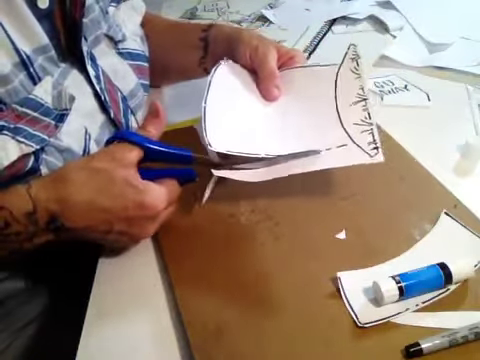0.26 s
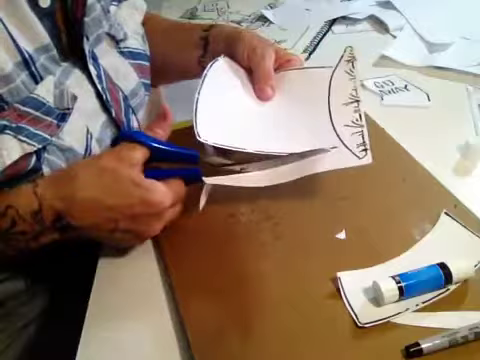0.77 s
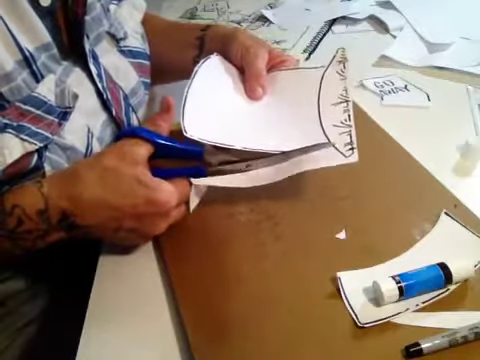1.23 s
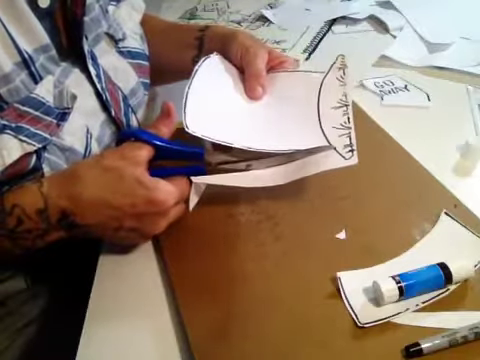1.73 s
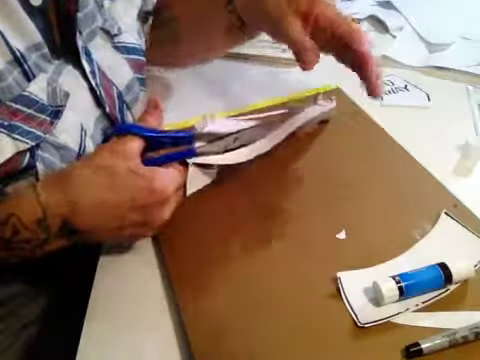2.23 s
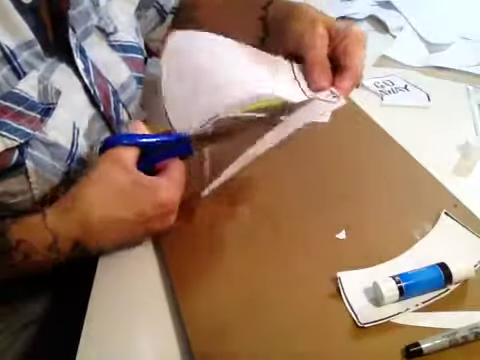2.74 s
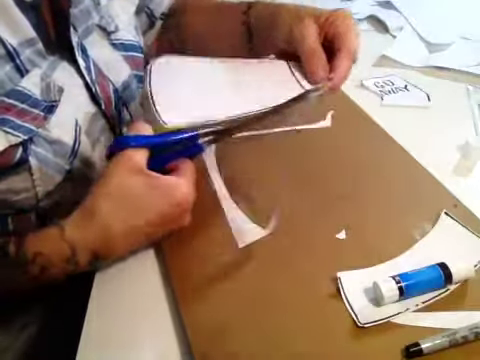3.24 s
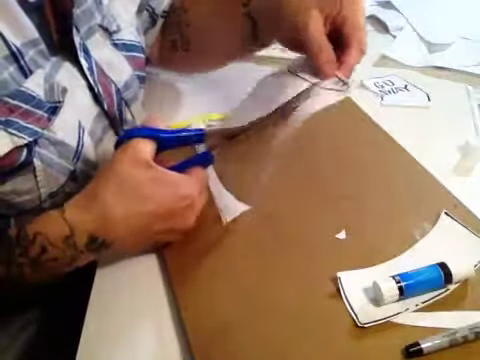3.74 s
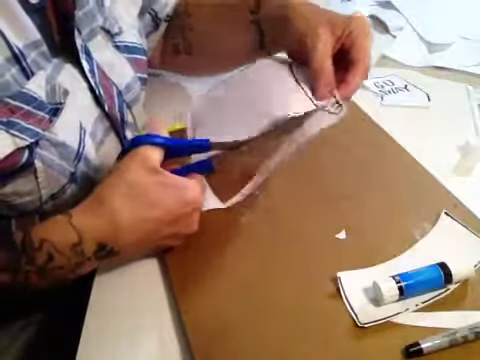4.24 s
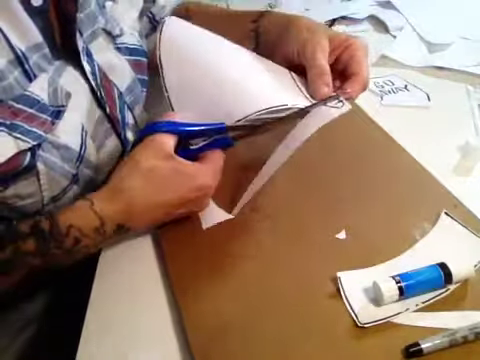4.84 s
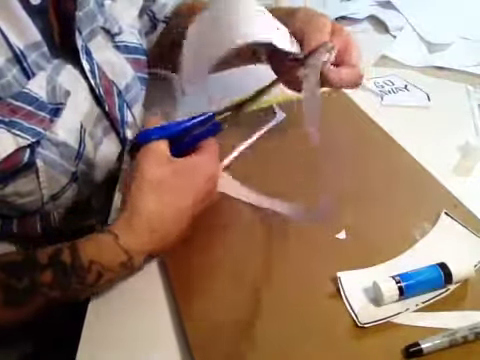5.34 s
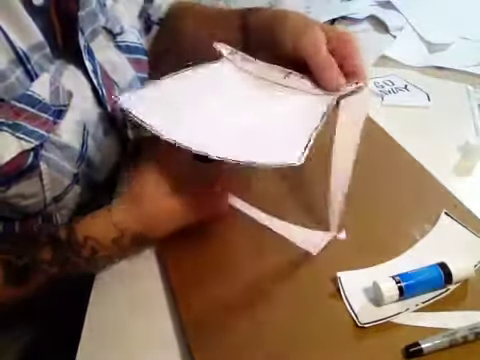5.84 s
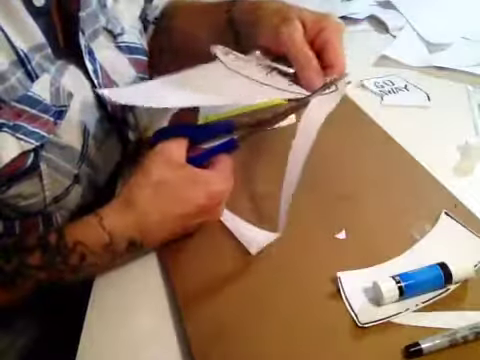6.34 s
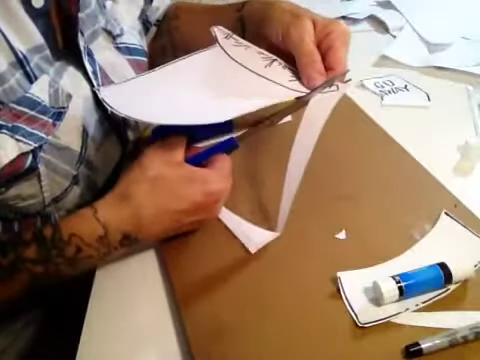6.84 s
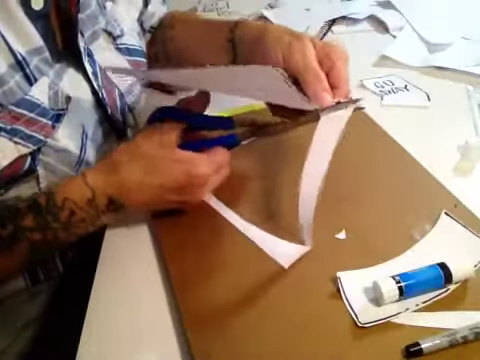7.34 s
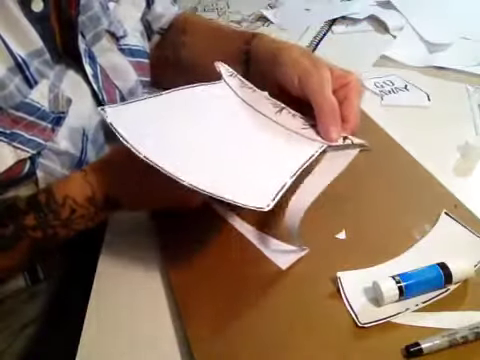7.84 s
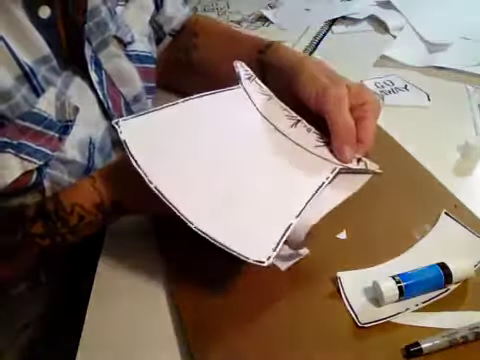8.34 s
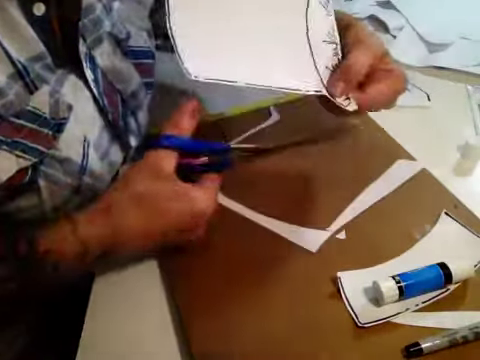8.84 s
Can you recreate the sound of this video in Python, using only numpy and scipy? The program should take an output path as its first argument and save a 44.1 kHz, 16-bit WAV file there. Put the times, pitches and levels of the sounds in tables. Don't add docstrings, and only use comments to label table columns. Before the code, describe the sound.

Close, bright recording in a small room with short echoes, a faint low fan hum and soft steady hiss throughout. From 0 to 1.8 seconds scissors bite through paper in rapid uneven strokes, a gritty stream of tiny fibre clicks with metallic grinding and blade chatter. After a brief lull the sheet knocks the desk dully at about 2.0, then crumples loudly around 2.4 to 2.5. From 2.7 to 5 it rustles, rubs and flaps softly, with small folds and pops near 3.5 and 3.75. Crackling strengthens from 5.2, reaching a deep, heavy crumple at 5.7 to 5.9. From 6.2 short trims come with quiet gaps; crisp bright snips cluster around 7.4 to 7.6, thin out near 8, then build to a sharp, strong snip at 8.55. A last rustle and lighter click fall at about 9.05.

```python
import sys
import numpy as np
from scipy import signal
from scipy.io import wavfile
from scipy.ndimage import uniform_filter1d

SR = 44100
rng = np.random.default_rng(int(sys.argv[2]) if len(sys.argv) > 2 else 0)


def attenuation_scalar(level_db):
    decades = np.asarray(level_db, float) / 20
    return 10 ** decades


def transcribe(u):
    v = np.clip(np.atleast_2d(u).T, -1, 1)
    q = np.round(v * 32767).astype(np.int16)
    wavfile.write(sys.argv[1], SR, q)


N = 401310

# pitch_hz, level_db
TEAR_SPECTRUM = [(900, -39), (1800, -9.5), (3000, 0), (5000, 1), (8000, 2.5), (11000, 3), (14000, 5.5),
                 (16500, -2)]
# pitch_hz, level_db
SHEET_SPECTRUM = [(300, -28), (1000, -7.5), (1200, 2.5), (1600, 0), (2200, 0.5), (3200, -2), (5000, -6.5),
                  (9000, -24)]
# pitch_hz, level_db
KNOCK_SPECTRUM = [(120, -20.5), (260, -14.5), (380, -4), (480, -6.5), (600, -4), (820, -6.5), (1100, -13.5),
                  (2500, -43.5)]
# start_s, flap_looseness_db, edge_tautness_db
GRIP_CURVE = [(0, -18, -2), (.47, -14.5, -4), (.7, -14, -3), (1.4, -9.5, -4), (1.75, -52, -3.5),
              (2.05, 2.5, -5), (2.3, -20, -2.5), (2.65, -3.5, -5), (3.3, -9.5, -3.5), (4.1, -18.5, -2.5),
              (5.2, -6, -4.5), (5.75, -16.5, -3.5), (5.9, -7, -4), (6.4, -7, -4), (7.05, -4, -2.5),
              (7.4, -14, -2), (8.4, -28, -3), (9.1, 4.5, -2.5)]


def evened(x):
    return x / np.sqrt(np.mean(x ** 2) + 1e-20)


def colour(x, points):
    hz, db = np.transpose(points)
    bins_hz = np.fft.rfftfreq(4096, 1 / SR)
    log_gain = np.log(attenuation_scalar(np.interp(np.log(bins_hz + 1), np.log(hz), db)))
    circle = np.concatenate([log_gain, log_gain[-2:0:-1]])
    taps = np.fft.ifft(np.exp(np.conj(signal.hilbert(circle)))).real[:2048]
    return signal.oaconvolve(x, taps / np.linalg.norm(taps))[:N]


def ring(x, modes):
    t = np.arange(4096) / SR
    taps = np.zeros(len(t))
    for hz, width_hz, db in modes:
        decay = np.sqrt(4 * np.pi * width_hz / SR) * np.exp(-np.pi * width_hz * t)
        taps += attenuation_scalar(db) * decay * np.sin(2 * np.pi * hz * t)
    return signal.oaconvolve(x, taps)[:N]


def fibres(per_s, spread_db, clump_db, clump_s):
    window = int(clump_s * SR) + 1
    clumps = evened(uniform_filter1d(uniform_filter1d(rng.standard_normal(N), window), window))
    size = attenuation_scalar(spread_db * np.minimum(rng.exponential(1, (4, N)), 4) + clump_db * clumps)
    sign = rng.choice([-1., 1.], (4, N))
    return evened(size * sign * (rng.random((4, N)) < per_s / SR))


def stroke_power():
    # peak_s, rise_s, fall_s, tearing_db, blades_over_tearing_db
    long_cuts = [(.02, 0.022, 0.3, -51, -7), (.19, 0.19, 0.096, -52, -8), (0.381, 0.066, 0.17, -48, -22),
                 (.47, 0.16, 0.13, -50.5, -7.5), (.692, 0.023, 0.13, -47.5, -5.5),
                 (.776, 0.075, 0.13, -53, -4), (.882, 0.014, 0.12, -57.5, -12),
                 (1.042, 0.035, 0.34, -52.5, -18), (1.338, .015, 0.22, -54.5, -19.5),
                 (1.39, 0.095, 0.27, -55, -7), (1.576, 0.065, 0.056, -56, -11),
                 (1.666, 0.028, 0.04, -51.5, -12), (1.766, 0.16, 0.027, -54, -15)]
    # peak_s, rise_s, fall_s, rubbing_db, sheet_over_rubbing_db
    turns = [(1.97, 0.11, 0.029, -51.5, -4), (2.08, 0.11, 0.16, -45, -8), (2.298, 0.25, 0.18, -45, -4),
             (2.446, 0.011, 0.16, -39, -9.5), (2.47, 0.027, 0.31, -45, 2), (2.704, 0.17, 0.076, -51.5, -9),
             (3.26, 0.88, 0.21, -53.5, -2), (3.36, 0.1, 0.29, -51, -2), (3.54, 0.32, 0.26, -51, 2.5),
             (3.66, 0.032, 0.14, -47.5, -15), (3.78, 0.13, 0.76, -51, 1), (4.071, 0.041, 0.3, -46, -1.5),
             (4.34, 0.068, 0.27, -50, -2), (4.51, 0.2, 0.088, -46, -5.5), (4.58, 0.075, 0.13, -46.5, -6),
             (4.769, 0.19, 0.26, -43.5, -3.5), (4.87, 0.26, 0.052, -48, -5), (3.0, 0.5, 0.15, -59, -9),
             (5.124, 0.14, 0.43, -43, -9), (5.302, 0.017, 0.45, -45, -6), (5.47, 0.5, 0.025, -48, -25),
             (5.558, 0.07, 0.32, -44, -14), (5.724, 0.14, 0.1, -36, -7), (5.822, 0.092, 0.37, -40, -7)]
    # peak_s, rise_s, fall_s, tearing_db,
    # sheet_over_tearing_db
    trims = [(6.168, 0.059, 0.76, -53, -9), (6.446, 0.17, 0.031, -52, -5), (6.754, 0.029, 0.16, -55.5, -2),
             (7.044, 0.05, 0.068, -46.5, -3.5), (7.214, 0.34, 0.11, -51.5, -7.5),
             (7.43, 0.22, 0.18, -48, -4.5), (7.594, 0.057, 0.17, -46.5, -8.5),
             (7.696, .1, 0.39, -59.5, -14), (7.938, .02, .6, -63.5, -19), (8.134, 0.025, 0.089, -54.5, -11),
             (8.256, 0.35, .3, -58, -17), (8.4, 0.032, 0.054, -48.5, -10), (8.54, 0.12, 0.35, -45, -8),
             (8.68, .12, 0.16, -47, -11), (8.75, 0.35, 0.067, -44.5, -4.5), (9.042, .027, 0.62, -55, -15)]
    # start_s (centre), half_width_s, depth_db
    pauses = [(1.25, .03, -4), (2.19, .03, -4), (2.58, .02, -5), (2.78, .03, -4), (2.92, .02, -4),
              (3.145, .025, -4), (3.62, .02, -4), (3.955, .03, -4), (4.18, .05, -4), (4.62, .03, -4),
              (5.5, .015, -4), (6.04, .06, -6), (6.55, .08, -8), (7.34, .04, -6)]
    fade_db, fade_bend = 27, 1.225
    rows = [(*row, 2.5 + 0.15 * blades_db, blades_db) for *row, blades_db in long_cuts]
    rows += [(*row, -43) for row in [*turns, *trims]]
    clock = np.arange(0, N, 32) / SR
    power = np.zeros((4, len(clock)))
    for peak_s, rise_s, fall_s, db, sheet_db, blades_db in rows:
        away = np.where(clock < peak_s, (peak_s - clock) / rise_s, (clock - peak_s) / fall_s)
        shares = attenuation_scalar([-1.5, sheet_db - 5.5, sheet_db, blades_db])
        power += np.outer(shares, attenuation_scalar(db - fade_db * away ** fade_bend)) ** 2
    for s, half_s, depth_db in pauses:
        power *= attenuation_scalar(2 * depth_db * np.exp(-((clock - s) / half_s) ** 2))
    return np.array([np.interp(np.arange(N) / SR, clock, p) for p in power])


def efforts():
    # start_s, tearing_db, sheet_over_tearing_db
    cut_slips = [(0.013, -36, -10.5), (.085, -32.5, -13), (0.1425, -31, -12.5), (0.326, -52, 5.5),
                 (.3641, -45, -5), (.47, -43, -9), (.686, -38, -19), (0.716, -31.5, -10),
                 (.8816, -37, -10.5), (1.034, -31, -22), (1.074, -30, -25), (1.14, -38, -15),
                 (1.3334, -37, -16), (1.3718, -33, -10.5), (1.4046, -29, -13), (1.488, -32, -17),
                 (1.536, -34.5, -11.5), (1.5684, -33, -14.5), (1.6631, -48, -14), (1.7444, -47, -18),
                 (1.7629, -33, -25)]
    # start_s, tearing_db, sheet_over_tearing_db
    turn_slips = [(2.424, -27, -12), (2.4433, -35, -19), (2.4607, -19.5, -4), (2.5314, -28.5, -5),
                  (2.838, -45, -6.5), (3.051, -38, -12), (3.1757, -37, -4), (3.235, -35.5, -6),
                  (3.3484, -46, 4), (3.497, -46, 9), (3.7784, -42, 6), (3.902, -33.5, -5),
                  (4.004, -36, -15), (4.228, -38.5, -31), (4.283, -39, -12), (4.3794, -42, -2),
                  (4.568, -34, -20), (4.666, -31.5, -36), (5.178, -25.5, -13.5), (5.2963, -27.5, -22),
                  (5.5258, -41, -9), (5.734, -22, -30), (5.7882, -25, -32), (5.839, -23.5, 1),
                  (6.17, -51, -14), (6.243, -37, -14.5)]
    # start_s, tearing_db, sheet_over_tearing_db
    trim_slips = [(6.754, -29, -14), (6.81, -41, -12), (7.011, -36, -5), (7.0325, -26, -15),
                  (7.1365, -34.5, -9), (7.435, -27, -30), (7.5847, -25, -22), (8.012, -36, -21),
                  (8.1884, -37, -11), (8.231, -29, -16), (8.314, -33.5, -12), (8.3918, -73, -18),
                  (8.4597, -29, -19), (8.485, -34, -18), (9.0653, -38, -13)]
    power = stroke_power()
    grip_s, loose_db, _ = np.transpose(GRIP_CURVE)
    looseness = attenuation_scalar(np.interp(np.arange(N) / SR, grip_s, loose_db))
    power[2] = power[2] * looseness ** 2 + attenuation_scalar(-73) ** 2
    t = np.arange(8000) / SR
    # slips, t60 in s, blades over the sheet in dB
    for slips, t60, blades_db in [(cut_slips, 0.054, 9.5), (turn_slips, 0.09, -20.5), (trim_slips, 0.055, -20.5)]:
        for s, slip_db, sheet_db in slips:
            swell = (1 - np.exp(-t / 0.006)) * attenuation_scalar(slip_db - 8 - 60 * t / t60)
            shares = attenuation_scalar([0, sheet_db + 4.5, sheet_db - 5.0, sheet_db + blades_db])
            part = power[:, round(s * SR) - 40:][:, :len(t)]
            part += np.outer(shares, swell[:part.shape[1]]) ** 2
    return np.sqrt(power)


def bending(x, patchy_db, tilt):
    hz, t, z = signal.stft(x, SR, nperseg=256)
    patches = rng.standard_normal(z.shape[::-1]).T
    for _ in range(2):
        patches = uniform_filter1d(uniform_filter1d(patches, size=7, axis=0), size=14, axis=1)
    grip_s, _, taut_db = np.transpose(GRIP_CURVE)
    crisp_db = np.interp(t, grip_s, taut_db + 3.345)
    slope = tilt * np.log2(np.clip(hz, 3000, 15000) / 9500)[:, None]
    bent = z * attenuation_scalar(patchy_db * evened(patches) + slope * crisp_db)
    return signal.istft(bent, SR, nperseg=256)[1][:N]


def cutting():
    # pitch_hz, width_hz, level_db
    blade_modes = [(1150, 90, -7), (1900, 160, -6), (2200, 220, -2), (2780, 200, -6), (3650, 110, -11)]
    # pitch_hz, width_hz, level_db
    edge_modes = [(1195, 48, -31), (11500, 2400, -16), (14300, 2800, -3)]
    tear, sheet, flap, blades = efforts() * fibres(per_s=12000, spread_db=2.5, clump_db=1.1, clump_s=0.009)
    grinding = np.arange(N) / SR < 1.9
    edge = colour(tear, TEAR_SPECTRUM) + ring(grinding * tear, edge_modes)
    paper = bending(edge + colour(sheet, SHEET_SPECTRUM), patchy_db=2.0, tilt=1.98)
    return paper + colour(flap, KNOCK_SPECTRUM) + ring(blades, blade_modes)


def fan():
    # pitch_hz, width_hz, level_db
    fan_modes = [(176, 9, -61.5), (194, 8, -66), (297, 10, -70)]
    # pitch_hz, level_db (per Hz)
    air_spectrum = [(28, -9), (55, -20), (100, -7.5), (150, -11.5), (290, -0.5), (490, -13), (1000, -20),
                    (3650, -23.5), (16500, -26)]
    motor_hz, motor_db, air_db = 216.7, -64, -61.5
    tones = sum(ring(rng.standard_normal(N), [mode]) for mode in fan_modes)
    tones = signal.sosfilt(signal.butter(4, 150, "highpass", fs=SR, output="sos"), tones)
    tones += np.sqrt(2) * attenuation_scalar(motor_db) * np.sin(2 * np.pi * motor_hz * np.arange(N) / SR)
    return tones + attenuation_scalar(air_db) * colour(rng.standard_normal(N), air_spectrum)


def swells(rows, sharpness):
    t, out = np.arange(8000) / SR, np.zeros(N)
    for s, db, hz, t60 in rows:
        note = evened(signal.lfilter(*signal.iirpeak(hz, sharpness, SR), rng.standard_normal(len(t))))
        out[round(s * SR):][:len(t)] += note * (1 - np.exp(-t / 0.0071)) * attenuation_scalar(db - 60 * t / t60)
    return out


def chatters():
    # start_s, level_db, pitch_hz, t60_s
    chatter_events = [(.015, -41.5, 2000, 0.066), (.715, -44.5, 2170, 0.23), (.765, -44, 2220, 0.13),
                      (.77, -46, 7300, 0.067), (1.07, -48, 8200, .05), (1.16, -50, 7300, .04),
                      (1.39, -47, 2250, 0.19), (1.567, -45, 2230, 0.063), (1.67, -54, 2200, .08),
                      (1.752, -40, 2200, 0.086), (1.49, -45, 8300, 0.056), (1.54, -46, 8000, 0.054),
                      (1.57, -41, 8000, 0.059), (1.765, -44, 8100, .05), (.885, -43, 2350, 0.057),
                      (.72, -43, 1250, 0.054), (6.25, -62, 3800, .5), (6.3, -62, 7000, .5),
                      (6.3, -62, 11700, .5), (6.41, -56, 7000, .1), (4.08, -54, 2900, .2),
                      (1.72, -50, 2100, .1)]
    return swells(chatter_events, sharpness=14)


def breaks():
    # start_s, crack_db,
    # sheet_over_crack_db, pitch_hz
    ticks = [(0.065, -27.5, -21, 13900), (0.689, -31, -19, 13500), (2.14, -44, -32, 8000),
             (3.752, -30.5, -25, 13700), (5.179, -25, -20, 10200), (5.2728, -39, -19, 14400),
             (5.6542, -26, -17, 14300), (6.669, -46, -22, 9000), (7.2072, -30, -37, 11800),
             (7.3397, -31.5, -18, 11400), (7.3816, -27, -19.5, 10800), (7.395, -22.5, -27, 9600),
             (7.409, -25, -25, 9540), (7.4713, -28.5, -34, 8990), (7.534, -24.5, -40, 10000),
             (7.5866, -27, -30, 13400), (7.5914, -28, -32, 9630), (7.5964, -29, -25, 10600),
             (7.7545, -33.5, -38, 13300), (7.936, -36, -38, 12100), (7.9935, -30.5, -30, 10100),
             (8.1135, -46, -30, 10000), (8.131, -40, -26, 3570), (8.131, -27, -34, 9700),
             (8.2601, -30.5, -38, 13300), (8.5226, -36, -34, 14100), (8.5345, -24, -23, 14300),
             (8.5502, -14.5, -52, 13400), (9.0305, -33, -31, 14400), (9.045, -24, -23, 13800),
             (2.4305, -35, -23, 6400), (2.539, -25, -20, 4500), (3.656, -38, -23, 12600),
                (3.967, -43, -25, 13500), (4.062, -38, -25, 9150), (4.687, -32, -25, 12600),
                (5.294, -30, -28, 11700), (5.3155, -32, -15, 3600), (6.7538, -41, -13, 7000),
                (7.4452, -27, -28, 9000), (7.4485, -24, -33, 9300), (7.4525, -25.5, -33, 10500),
                (8.194, -41, -30, 13900), (8.239, -41, -30, 13900), (8.4903, -31, -30, 13600),
                (9.066, -38, -20, 10100), (9.0705, -36, -30, 13500)]
    # start_s, crack_db, sheet_over_crack_db, t60_s, pitch_hz
    buckles = [
        (.1984, -32.5, -13, 0.026, 2060),
        (2.5216, -23, -12, 0.017, 1490),
        (3.531, -30, -24, 0.013, 3160),
        (3.738, -33.5, -12, 0.014, 2170),
        (3.767, -35, -5, 0.0058, 1960),
        (5.7153, -23.5, -7, 0.017, 1250),
        (6.7105, -54, 10, 0.016, 1530),
    ]
    # start_s, crack_db, sheet_over_crack_db, pitch_hz
    taps = [
        (2.0369, -29, -3.5, 520),
    ]
    snapped = [(s, db, sheet_db, sheet_db - 5, 0.0084, hz) for s, db, sheet_db, hz in ticks]
    snapped += [(s, db, sheet_db, sheet_db - 20.5, t60, hz) for s, db, sheet_db, t60, hz in buckles]
    snapped += [(s, db, sheet_db, sheet_db - 5, 0.011, hz) for s, db, sheet_db, hz in taps]
    return snapped


def snaps():
    t = np.arange(4000) / SR
    crack, sheet, knock, tone = np.zeros((4, N + len(t)))
    for s, crack_db, sheet_db, knock_db, t60, hz in breaks():
        spray = rng.standard_normal((3, len(t))) * attenuation_scalar(crack_db - 60 * t / t60)
        spray[0] *= 2.0 * (1 - np.exp(-t / 0.00059))
        spray[1:, :9] = 0.27 * attenuation_scalar(crack_db)
        dull = hz < 3500
        struck = attenuation_scalar(sheet_db + 12) * spray[1] if dull else attenuation_scalar(-5.0) * spray[0]
        at = slice(round(s * SR), round(s * SR) + len(t))
        tone[at] += signal.lfilter(*signal.iirpeak(hz, 5.5, SR), struck)
        crack[at] += attenuation_scalar(-13.0) * spray[0]
        sheet[at] += attenuation_scalar(sheet_db + 0.5) * spray[1]
        knock[at] += attenuation_scalar(knock_db + 2.5) * spray[2]
    paper = colour(crack, TEAR_SPECTRUM) + colour(sheet, SHEET_SPECTRUM)
    return paper + colour(knock, KNOCK_SPECTRUM) + tone[:N]


def wobbles():
    # start_s, level_db, pitch_hz, t60_s
    wobble_events = [(.47, -48, 590, 0.25), (2.3, -44, 180, 0.076), (2.036, -42, 660, 0.095),
                     (2.84, -48, 610, 0.13), (3.238, -51, 620, 0.093), (3.325, -48, 550, 0.19),
                     (3.365, -45, 660, .09), (3, -47, 1300, .12), (2.523, -37, 1060, 0.096),
                     (3.77, -42, 1340, 0.12), (2.462, -32, 2800, .07), (5.4, -45, 1300, .05),
                     (.32, -40, 1300, .05), (4, -60, 600, .06), (3.575, -44, 570, 0.088),
                     (5.65, -43, 690, 0.095), (5.845, -39, 620, 0.17), (7.035, -45, 510, 0.087)]
    return swells(wobble_events, sharpness=2.9)


def pings():
    # start_s, level_db (peak), pitch_hz,
    # t60_s
    ping_events = [(2.0368, -24.5, 494, 0.013), (2.038, -32, 1540, .015), (2.046, -41.5, 370, .07),
                   (2.048, -41, 640, 0.046), (2.463, -32, 2970, 0.018), (2.474, -25.5, 2800, .012),
                   (2.481, -34, 3200, .015), (2.522, -26, 1410, 0.023), (2.522, -28, 4300, .025),
                   (2.522, -31, 6400, 0.0077), (2.535, -30, 1280, 0.014), (3.349, -40, 1910, 0.019),
                   (3.361, -42, 1300, .025), (3.376, -45, 6930, .025), (3.379, -44, 650, .03),
                   (3.737, -39, 3560, .015), (3.7665, -35.5, 2010, 0.02), (3.776, -39, 1200, .03),
                   (3.789, -39, 1550, .02), (3.794, -40, 1600, .015), (4.0645, -43, 2120, .015),
                   (4.333, -44, 1330, .02), (4.3773, -41.5, 1170, .02), (5.18, -40, 1980, 0.014),
                   (5.536, -42, 4310, .015), (5.7153, -30.5, 1250, 0.028), (5.7155, -32, 6000, .012),
                   (5.715, -32, 2600, .015), (5.843, -31, 5350, .014), (5.845, -30, 2960, 0.018),
                   (5.846, -28.5, 1710, .03), (5.857, -30.5, 1180, .03), (5.864, -36, 2600, 0.044),
                   (6.709, -43.5, 1250, 0.025), (6.7105, -40.5, 1900, 0.025), (6.711, -45, 3700, 0.02),
                   (6.716, -49, 2220, .03), (7.395, -32, 6140, 0.014), (8.1135, -53, 3450, .015),
                   (8.131, -41.5, 3510, 0.016), (8.131, -40, 13500, .02), (8.5505, -29, 4750, 0.01),
                   (8.5505, -27, 7500, .012), (9.045, -40.5, 4600, .015),
                   (3.22, -45, 9000, .02), (3.283, -45, 11000, .015), (3.808, -42, 4300, .02),
                    (3.984, -46, 9500, .012), (4.005, -43, 11000, .015), (4.229, -44, 12000, .015),
                    (4.295, -46, 9000, .012), (6.175, -42, 11500, .015), (6.195, -43, 12000, .02),
                    (6.206, -45, 12500, .015), (6.358, -47, 6500, .015), (6.365, -47, 3800, .015),
                    (7.3, -48, 3500, .02), (7.625, -42, 9500, .02), (8.42, -46, 11000, .02)]
    # pitch_ratio, level_db
    partners = [(1, 0), (.84, -8), (1.21, -7), (1.47, -12)]
    t, out = np.arange(4000) / SR, np.zeros(N + 4000)
    for s, db, hz, t60 in ping_events:
        modes = sum(attenuation_scalar(level_db) * np.sin(2 * np.pi * hz * ratio * t) for ratio, level_db in partners)
        out[round(s * SR):][:len(t)] += (1 - np.exp(-t / 0.00062)) * attenuation_scalar(db - 60 * t / t60) * modes
    return out[:N]


def room(x, t60=0.21):
    taps = np.zeros(SR // 2)
    at = np.arange(150, len(taps) - 22, 22)
    taps[at + rng.integers(0, 22, len(at))] = rng.choice([-1., 1.], len(at))
    hz, t, z = signal.stft(taps, SR, nperseg=128)
    tail = signal.istft(z * attenuation_scalar(-60 * t * (1 + hz[:, None] / 9000) / t60), SR, nperseg=128)[1]
    return signal.oaconvolve(x, tail / np.linalg.norm(tail))[:N]


def scene():
    work = cutting() + chatters() + snaps() + wobbles() + pings()
    shift_hz = 0.906
    turn = np.pi * shift_hz * np.arange(N) / SR
    echoes = sum(room(work * np.sqrt(2 / 3) * np.cos(turn + k * np.pi / 3)) for k in range(3))
    return (work + attenuation_scalar(-11.5) * echoes + fan())[None]


def top_cut(x):
    return signal.sosfilt(signal.butter(12, 16340, fs=SR, output="sos"), x)


def record(dry):
    thin = signal.sosfilt(signal.butter(3, 85, "highpass", fs=SR, output="sos"), dry)
    lowpass = signal.firwin(601, 15050, window=("kaiser", 8), fs=SR)
    limited = signal.oaconvolve(thin, lowpass[None], "same")
    above = thin - limited
    sudden = uniform_filter1d(above ** 2, size=200) > 5 * uniform_filter1d(above ** 2, size=3000)
    sparkle = attenuation_scalar(-30) * uniform_filter1d(1. * sudden, size=200) * above
    return top_cut(limited + sparkle)


dry = scene()
out = record(dry)
transcribe(out)
```